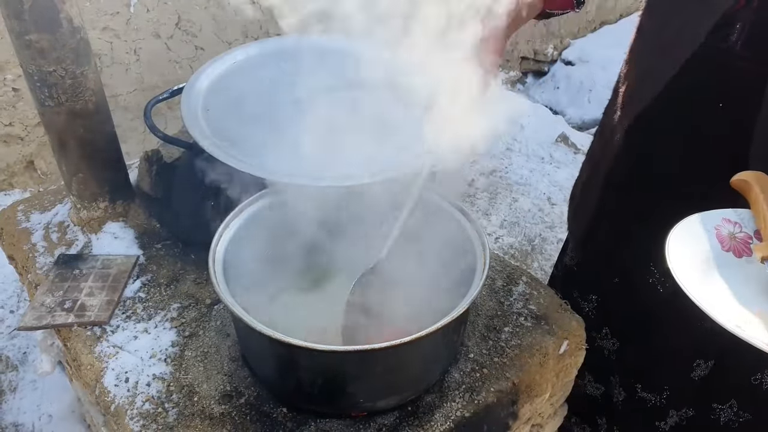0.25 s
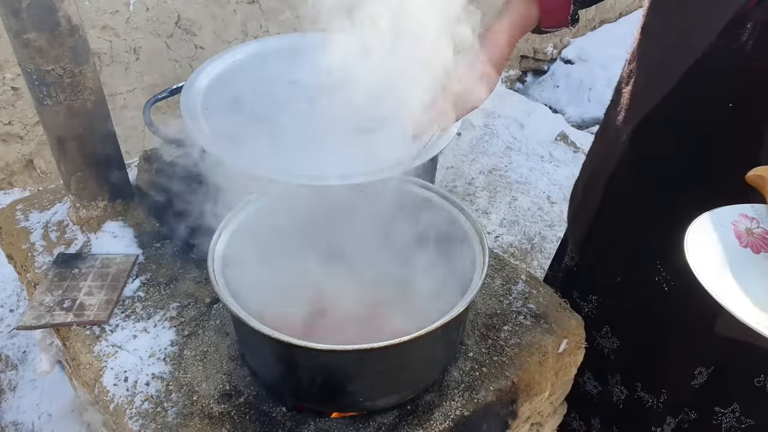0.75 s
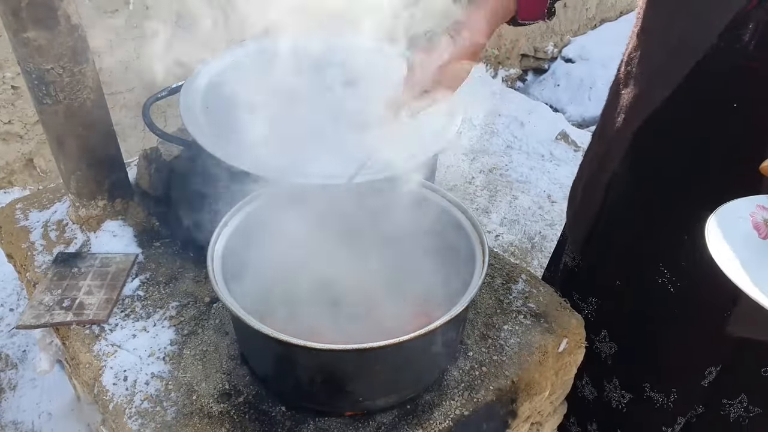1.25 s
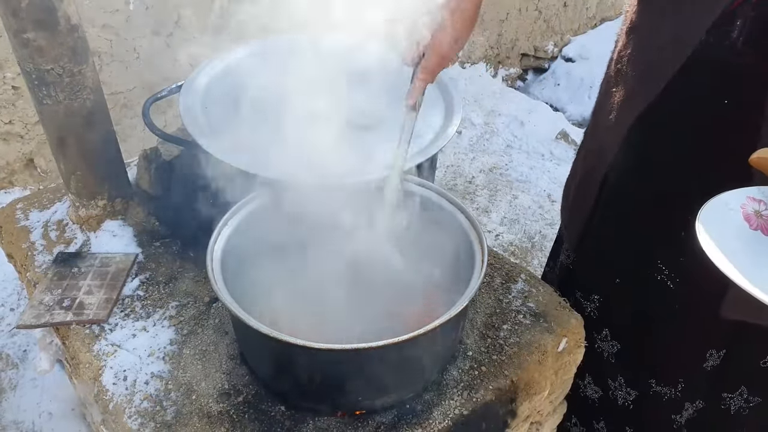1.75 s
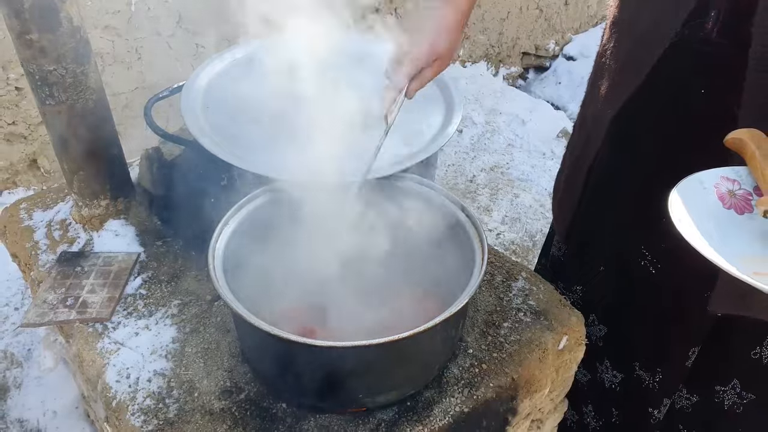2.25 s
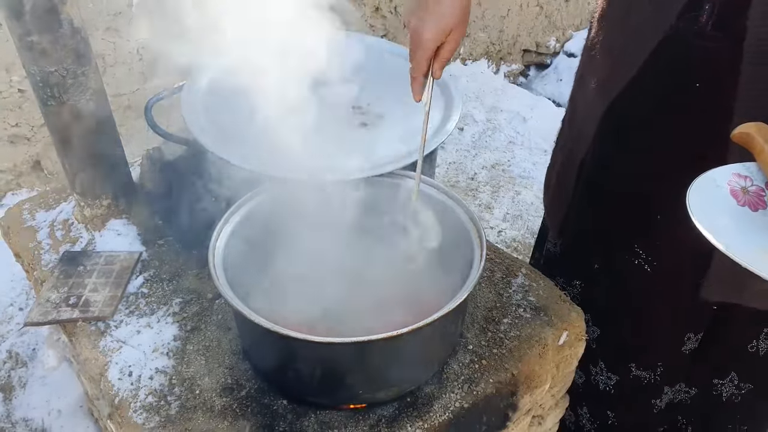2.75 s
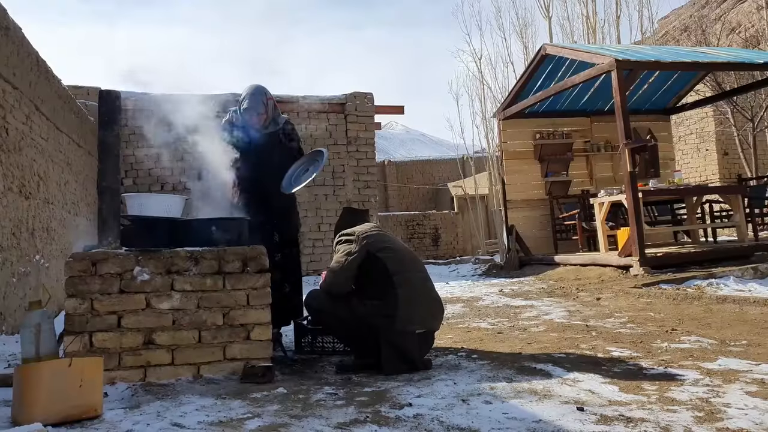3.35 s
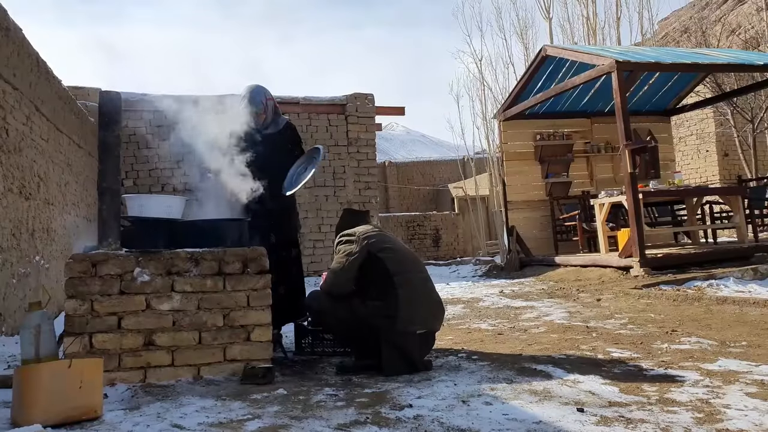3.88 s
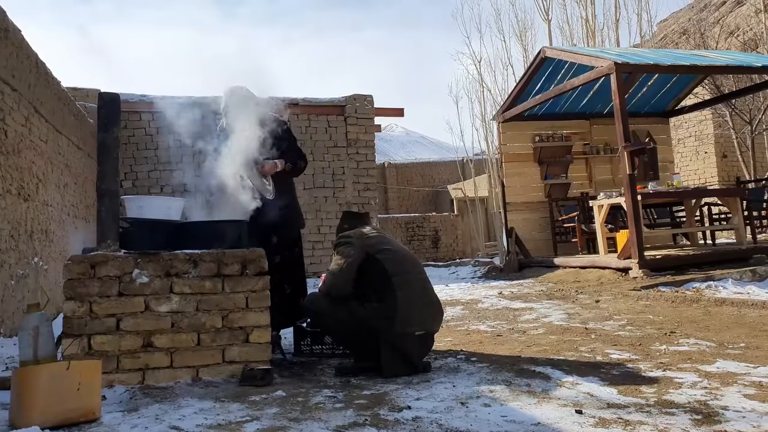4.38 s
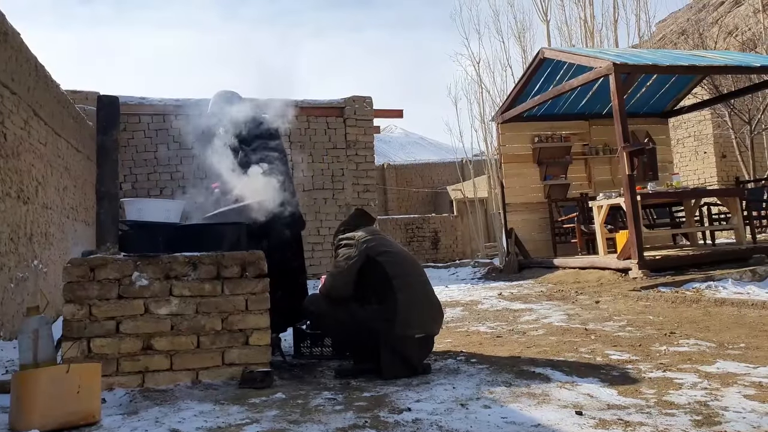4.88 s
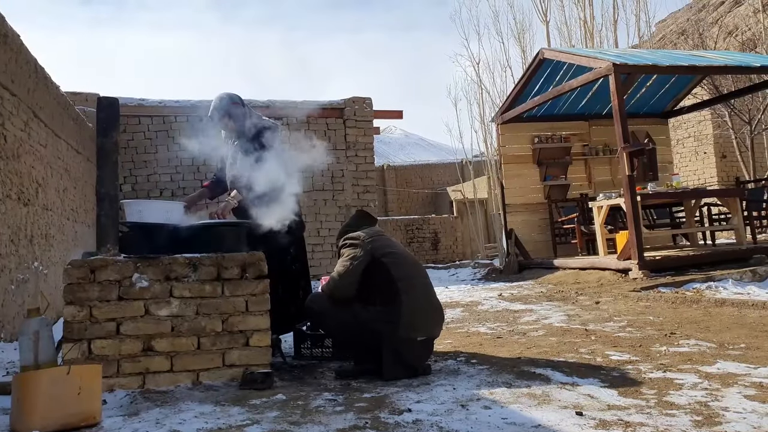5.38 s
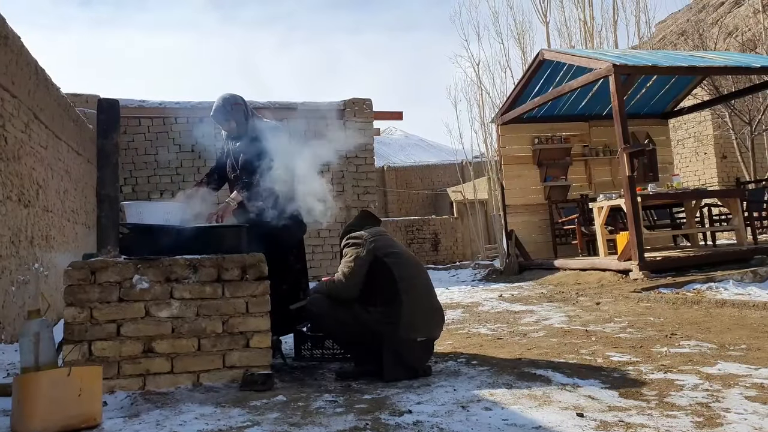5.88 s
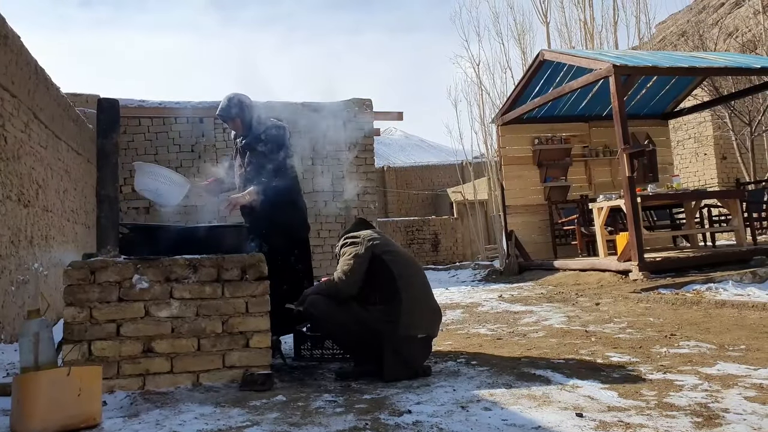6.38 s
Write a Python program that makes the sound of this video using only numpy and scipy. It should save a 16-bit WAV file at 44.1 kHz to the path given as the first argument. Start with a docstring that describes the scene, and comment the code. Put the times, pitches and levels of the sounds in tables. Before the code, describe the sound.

A big pot boils hard up close with gurgle and hiss, a ladle clanks its rim, then firewood knocks and scrapes across a yard.

```python
"""Close up, a big pot boils hard on an outdoor stove: bubbles gurgle and fizz and steam hisses (shaped noise
and short sines) while a ladle clinks the rim, thumps the wall and splashes (damped modes, noise bursts).
Then from across the yard: faint hiss in puffs, while firewood is knocked, scraped and dragged at the stove
mouth between mud walls (damped modes, noise swells, a wavering hum, a noise tail)."""
import sys
import numpy as np
from scipy import signal
from scipy.fft import rfft, irfft, next_fast_len
from scipy.io import wavfile
from scipy.ndimage import uniform_filter1d, map_coordinates

SR = 44100
rng = np.random.default_rng(int(sys.argv[2]) if len(sys.argv) > 2 else 0)


def bounce(signal):
    """Save signal as a 16-bit WAV file at the path given by the first command-line argument."""
    frames = np.transpose(np.atleast_2d(signal))
    limited = np.clip(frames, -1, 1)
    pcm = np.round(limited * 32767).astype(np.int16)
    wavfile.write(sys.argv[1], SR, pcm)


N = 291942
CONTACT_S = np.arange(SR // 4) / SR  # time after a contact

# grit of scraped or struck wood: freq_hz, density_db
GRIT_SPECTRUM = [(260, -57), (450, 0), (517, -3), (878, -12), (1080, -6), (1320, -11), (1660, -6),
                 (1800, -12), (2180, -13.5), (2600, -20.5), (3380, -23.5), (5720, -120)]
# crack of a hard contact, also the thin far fizz: freq_hz, density_db
CRACK_SPECTRUM = [(1500, -33), (2500, 2.5), (4500, 7.5), (7000, -6), (12000, -5.5), (16000, -20)]
# sharp bright tick of a hard contact: freq_hz, density_db
TICK_SPECTRUM = [(2000, -44), (4000, -2), (8000, -4), (16000, -11)]


def amp(db):
    """Gain of a level in dB."""
    return 10 ** (np.asarray(db) / 20)


def unit(x):
    """Scaled to rms 1."""
    return x / np.sqrt(np.mean(x ** 2) + 1e-20)


def along(points, hz):
    """Interpolates (freq_hz, value) points on a log frequency axis."""
    freq_hz, value = np.transpose(points)
    return np.interp(np.log(hz + 1), np.log(freq_hz + 1), value)


def curve(rows):
    """One value per sample from (time_s, value) rows."""
    time_s, value = np.transpose(rows)
    return np.interp(np.arange(N) / SR, time_s, value)


def wobble(rate_hz):
    """Smooth random curve, rate_hz knots a second."""
    knots = rng.standard_normal(int(N * rate_hz / SR) + 4)
    return map_coordinates(knots, [np.arange(N) * rate_hz / SR])


def flutter(rate_hz, depth_db):
    """Uneven gain over one contact, as loose parts touch and part."""
    knots = np.arange(int(rate_hz * CONTACT_S[-1]) + 2)
    return amp(depth_db * np.interp(CONTACT_S * rate_hz, knots, rng.standard_normal(len(knots))))


def swells(rows, rise_s, t60_s):
    """Gain of events that rise, hold and die away; one curve for each dB column."""
    start_s, held_s, *levels_db = np.transpose(rows)
    grid_s = np.arange(0, N / SR, 1 / 1000)
    since_s = grid_s - start_s[:, None]
    fall_s = np.clip(since_s - rise_s - held_s[:, None], 0, 1)
    shape = np.clip(since_s / rise_s, 0, 1) * amp(-60 * fall_s / t60_s)
    # overlapping events add in power
    gains = [np.sqrt(amp(2 * level_db) @ shape ** 2) for level_db in levels_db]
    return [np.interp(np.arange(N) / SR, grid_s, gain) for gain in gains]


def filtered(x, response):
    """x times a response of frequency."""
    m = next_fast_len(x.shape[-1] + 8192)
    return irfft(rfft(x, m) * response(np.fft.rfftfreq(m, 1 / SR)), m)[..., :x.shape[-1]]


def rush(spectrum, lump_rate_hz, lump_db, patchy_db=2.5):
    """Stereo noise, mid rms 1, with random level changes over time and frequency."""
    # left-right likeness: freq_hz, correlation
    likeness = [(60, 0.97), (150, 0.96), (380, 0.84), (950, 0.8), (2380, 0.25), (5980, -0.0034),
                (15000, -0.02)]
    # left over right: freq_hz, balance_db
    balance = [(60, 0.5), (180, -1.5), (550, 0), (1650, 0.5), (4970, -1), (15000, -6)]
    lumpy = rng.standard_normal((2, N)) * amp(lump_db * wobble(lump_rate_hz))
    z = signal.stft(lumpy, nperseg=1024)[2]
    patches = uniform_filter1d(rng.standard_normal(z.shape[1:]), size=4, axis=0)
    patches = unit(uniform_filter1d(patches, size=4, axis=1))
    pair = signal.istft(z * amp(patchy_db * patches), nperseg=1024)[1][:, :N]

    def mid_side(hz):
        angle = np.arccos(np.clip(along(likeness, hz), -1, 1)) / 2
        return amp(along(spectrum, hz)) * [np.cos(angle), np.sin(angle)]

    mid, side = filtered(pair, mid_side)
    sides = np.array([mid + side, mid - side])
    sides = filtered(sides, lambda hz: amp(np.outer([.5, -.5], along(balance, hz))))
    return sides / np.sqrt(np.mean(sides.mean(axis=0) ** 2))


def droplets(count, mid_hz, cycles):
    """Tiny bursting bubbles: short sines, gliding up, of scattered pitch, size and side."""
    where, side = rng.random(count), rng.random(count)
    size = rng.exponential(size=count)
    hz = np.clip(mid_hz * np.exp(.4 * rng.standard_normal(count)), 400, 14000)[:, None]
    n = np.arange(600)
    turns = hz * n / SR
    tone = np.sin(2 * np.pi * turns * (1 + 0.0025 * turns))
    fade = np.exp(-turns / cycles) * np.hanning(len(n)) ** 0.22
    drops = amp(2.0 * np.minimum(size, 3.5))[:, None] * tone * fade
    at = ((where * N).astype(int)[:, None] + n).ravel()
    panned = [(drops * np.sqrt(share)[:, None]).ravel() for share in (side, 1 - side)]
    return unit(np.array([np.bincount(at, x, N + len(n))[:N] for x in panned]))


def ring(modes, spread_db, attack_s, rough_db=0):
    """Damped modes (hz, db, t60_s), struck at new strengths, each wavering on its own."""
    tones = 0
    for hz, db, t60_s in modes:
        decay = amp(db + spread_db * rng.standard_normal() - 60 * CONTACT_S / t60_s)
        tones = tones + decay * flutter(51, rough_db) * np.sin(2 * np.pi * hz * CONTACT_S)
    return tones * (1 - np.exp(-CONTACT_S / attack_s))


def burst(spectrum, t60_s, attack_s):
    """A grainy puff of coloured noise that dies away."""
    grains = rng.standard_normal(len(CONTACT_S)) * flutter(200, depth_db=2.0)
    coloured = unit(filtered(grains, lambda hz: amp(along(spectrum, hz))))
    to_zero = 1 - (CONTACT_S / CONTACT_S[-1]) ** 2
    return coloured * amp(-60 * CONTACT_S / t60_s) * to_zero * (1 - np.exp(-CONTACT_S / attack_s))


def add(track, start_s, sound):
    """Mixes a sound in at a time."""
    track[round(start_s * SR):][:len(sound)] += sound


def walls(x):
    """Yard's answer: noise tail dying at its own speed per frequency, bass more alike at both sides."""
    # mud walls: freq_hz, t60_s
    wall_decay = [(150, 0.28), (1000, 0.28), (4000, 0.22), (12000, 0.13)]
    hz, t, z = signal.stft(rng.standard_normal((2, SR // 2)), SR, nperseg=256)
    apart = np.clip(hz / 900, .1, 1)[:, None]
    z = np.array([z[0] + apart * z[1], z[0] - apart * z[1]]) / np.sqrt(1 + apart ** 2)
    tail = signal.istft(z * amp(-60 * t / along(wall_decay, hz)[:, None]), SR, nperseg=256)[1]
    delayed = np.pad(x, (500, 0))  # samples
    return signal.fftconvolve(delayed[None], tail / np.linalg.norm(tail[0]), axes=1)[:, :N]


def placed(x, left_db, ports):
    """A small source, weak in the deep bass, reaching the two microphone ports at different phase."""
    half = np.array([[.5], [-.5]])

    def response(hz):
        bass_cut = (1j * hz / (85 + 1j * hz)) ** 2
        return amp(half * left_db) * np.exp(1j * half * along(ports, hz)) * bass_cut

    return filtered(x, response)


def ported(pair, ports):
    """Spread sound, too, reaches the two microphone ports at different phase."""
    return filtered(pair, lambda hz: np.exp(1j * np.outer([.5, -.5], along(ports, hz))))


def yard():
    """The pot from afar, hissing in puffs, and wood scraping and settling in uneven slips, as shaped noise."""
    # far hiss: time_s, level_db
    far_level = [(3.22, -67.5), (3.4, -68), (4.2, -68), (4.45, -68.5), (5.1, -66.5), (5.4, -71.5),
                 (6.15, -75.5), (6.25, -74.5), (6.62, -74)]
    # steam drifting by: start_s, held_s, level_db
    puff_rows = [(4.52, .15, -62.5), (4.68, .1, -63.5), (6.17, .36, -64)]
    # thin fizz just after the move: start_s, held_s, level_db
    linger_rows = [(3.22, .075, -60.5)]
    # wood scrapes and settles: start_s, held_s, rumble_db, grit_db, dust_db
    scrape_rows = [(3.31, 0.14, -70, -73, -76), (3.46, 0.044, -43.5, -63, -55.5),
                   (3.77, 0.04, -60, -63, -80), (3.9, .19, -71, -72, -81), (4.13, .16, -48.5, -56, -71),
                   (4.62, 0.31, -58.5, -72, -74.5), (5.42, 0.18, -46, -65, -64),
                   (5.8, 0.13, -43.5, -62, -65), (5.89, 0.063, -39.5, -51, -60.5),
                   (6.47, 0.1, -70, -71, -87.5)]
    # far fizz: freq_hz, density_db
    far_fizz = [(470, -6), (800, -3), (866, -3), (897, -12), (1220, 6), (1330, -5), (1660, 2), (1810, -2.5),
                (2570, -1), (3030, -4.5), (3520, -3.5), (3810, -5), (4870, -2.5), (6500, -5.5), (8450, -11),
                (14300, -120)]
    # far steam: freq_hz, density_db
    far_steam = [(2650, -49), (4500, -8), (5640, -2.5), (6270, -13), (7490, -8.5), (8500, -2), (12000, -3),
                 (14000, -5.5), (15100, -4.5), (15800, -9)]
    # scrape rumble: freq_hz, density_db
    rumble_spectrum = [(15, -59), (25, -33), (59, -14), (81, -13), (118, -7), (181, -9.5), (227, -0.5),
                       (270, -10), (305, -6.5), (425, -12), (518, -41.5), (600, -22), (780, -27),
                       (1320, -120)]
    still_rumble_db, still_grit_db = -64, -72  # floor, also between scrapes

    hiss = amp(curve(far_level))
    puff, = swells(puff_rows, rise_s=0.083, t60_s=0.19)
    linger, = swells(linger_rows, rise_s=.005, t60_s=.05)
    rumble, grit, dust = swells(scrape_rows, rise_s=0.0067, t60_s=0.36)
    fizz = amp(-0.5) * hiss + amp(-7) * puff + dust

    out = linger * rush(CRACK_SPECTRUM, 90, lump_db=-0.5)
    out += (hiss + puff) * rush(far_steam, 130, lump_db=0.6)
    out += fizz * rush(far_fizz, 60, lump_db=0.5)
    out += (amp(still_rumble_db) + rumble) * rush(rumble_spectrum, 30, lump_db=3)
    out += (amp(still_grit_db) + grit) * rush(GRIT_SPECTRUM, 65, lump_db=2.0)
    return out


def pot():
    """Big bubbles gurgle at the pot's air resonance, small ones fizz and ping, steam hisses on top."""
    # strength of the boil: time_s, strength_db
    boil = [(0, 0.5), (.45, 2), (.65, -.5), (.9, 1.5), (1.3, 0.5), (2.0, -1.5), (2.25, 1), (2.7, -0.5),
            (3.15, 2)]
    # gurgle: freq_hz, density_db
    gurgle_spectrum = [(15, -56), (25, -24), (70, -14.5), (102, -9), (161, -8), (205, -1.5), (249, 2),
                       (284, 1.5), (333, -15.5), (450, -14), (580, -46), (990, -120)]
    # bubbles: freq_hz, density_db
    bubble_spectrum = [(210, -40), (350, -8.5), (376, -2.5), (426, -12), (520, -2), (662, -10), (726, -2.5),
                       (802, 1), (983, -7), (1300, -10.5), (1690, -28), (2860, -120)]
    # fizz: freq_hz, density_db
    fizz_spectrum = [(590, -40), (1000, -8), (1530, -4.5), (1700, -4), (1970, -0.5), (2150, -8.5),
                     (2390, 0), (2700, -3), (2940, -3), (3960, 0), (5500, -8), (7150, -35), (12100, -120)]
    # steam: freq_hz, density_db
    steam_spectrum = [(2820, -28), (4800, -1.5), (6070, -2), (6840, 0.5), (8730, -2), (9500, 0),
                      (10900, -3), (11900, -0.5), (15000, -6), (15800, -4.5)]

    boil_db = curve(boil)
    # each layer: level at strength 0, plus its swing in dB per dB of strength
    gurgle = amp(-53 + 0.81 * boil_db) * rush(gurgle_spectrum, 25, lump_db=-1.5)
    bubbles = amp(-55.5 + 0.82 * boil_db) * rush(bubble_spectrum, 39.63, lump_db=0.5)
    pings = amp(-9) * droplets(count=5000, mid_hz=3354, cycles=13)
    fizz = amp(-49.5 + boil_db) * (rush(fizz_spectrum, 90, lump_db=1.5) + pings)
    steam_db = -49.5 + 0.63 * boil_db + 0.99 * wobble(17)
    steam = amp(steam_db) * rush(steam_spectrum, 150, lump_db=1.1)
    return gurgle + bubbles + fizz + steam


def clinks(track):
    """Ladle on the rim: damped rim modes, a crack and a higher tick."""
    # ladle on the rim: start_s, level_db, ring_db (relative)
    clink_rows = [(1.373, -23, 2.5), (1.453, -30, -27), (1.47, -26, -16), (1.524, -27.5, -22),
                  (1.544, -36.5, -19)]
    # rim modes: freq_hz, level_db, t60_s
    rim_modes = [(877, -12, .06), (1276, -3.5, 0.11), (3046, -3, 0.16), (3330, -14, 0.08), (3984, -6, 0.08),
                 (4220, -14, 0.09), (4390, -12, .1), (5900, -15, .04), (6780, -12, 0.053)]
    for start_s, db, ring_db in clink_rows:
        rim = amp(ring_db) * ring(rim_modes, spread_db=-1.5, attack_s=.002, rough_db=2.0)
        crack = 0.63 * burst(CRACK_SPECTRUM, t60_s=0.14, attack_s=0.00077)
        tick = amp(-5.5) * burst(TICK_SPECTRUM, t60_s=0.072, attack_s=.0008)
        add(track, start_s, amp(db) * (rim + crack + tick))


def thumps(track):
    """Ladle on the water-damped wall: modes at multiples of one base pitch."""
    # ladle on the wall: start_s, level_db, base_hz, t60_s, overtones_db (relative)
    thump_rows = [(0.15, -38.5, 262, 0.13, -13), (0.382, -37.5, 262.3, 0.37, -27),
                  (0.418, -36.5, 247.4, 0.31, -14), (1.373, -30, 252, 0.14, 1.5),
                  (1.454, -22, 263, 0.09, 0), (1.471, -7, 302.2, 0.096, 0.5),
                  (1.524, -11.5, 262, 0.063, -1.5), (1.55, -31.5, 257, 0.047, -9),
                  (2.252, -33.5, 240, 0.17, -22)]
    # wall modes: multiple of base_hz, level_db, share of t60_s
    wall_modes = [(1, 1.5, 0.72), (2, 2, 0.36), (3.7, -9.5, 0.47), (.8, -9, 1.4), (.55, -18.5, 1.4)]
    for start_s, db, hz, t60_s, over_db in thump_rows:
        modes = [(hz * k, level_db + over_db * (k > 1), t60_s * share) for k, level_db, share in wall_modes]
        add(track, start_s, amp(db) * ring(modes, spread_db=1.6, attack_s=0.0021))


def splashes(track):
    """Splashes as noise bursts, and a single drop falling back as two damped sines."""
    # falling drop: start_s, pitch_hz, level_db, t60_s
    plop_rows = [(.846, 2100, -37, .035)]
    # splashes: start_s, level_db, t60_s
    splash_rows = [(1.449, -28.5, 0.16), (1.545, -38.5, 0.18), (1.818, -31.5, 0.23), (1.83, -32, 0.57),
                   (1.885, -39, 0.45)]
    # spray: freq_hz, density_db
    spray_spectrum = [(76, -39), (130, -6), (202, -1.5), (425, -15), (689, -3.5), (859, -18.5), (1310, -7),
                      (1420, -7.5), (2120, -7.5), (2700, -9.5), (2870, -22.5), (3870, -13.5), (7080, -26.5),
                      (11700, -22.5), (15800, -26.5)]
    for start_s, hz, db, t60_s in plop_rows:
        modes = [(hz, db, t60_s), (hz * 1.12, db - 3, t60_s)]
        add(track, start_s, ring(modes, spread_db=.5, attack_s=.0015))
    for start_s, db, t60_s in splash_rows:
        add(track, start_s, amp(db) * burst(spray_spectrum, t60_s, attack_s=0.0039))


def ladle():
    """All contacts of the ladle with rim, wall and water, mono."""
    track = np.zeros(N + SR)
    clinks(track)
    thumps(track)
    splashes(track)
    return track[:N]


def ticks(track):
    """Sharp bright ticks of hard contacts, mostly on top of a knock: short noise bursts."""
    # ticks: start_s, level_db
    tick_rows = [(3.434, -41), (3.4995, -35.5), (3.8985, -68), (4.1626, -50), (4.213, -51), (4.3037, -53),
                 (4.598, -52), (5.4196, -47.5), (5.431, -53), (5.49, -50), (5.864, -50), (5.887, -58),
                 (5.912, -52), (5.93, -58)]
    for start_s, db in tick_rows:
        add(track, start_s, amp(db) * burst(TICK_SPECTRUM, t60_s=0.047, attack_s=0.00037))


def dragged_wood():
    """A hollow piece dragged in slips: a hum of wavering pitch and level."""
    # slips: start_s, held_s, level_db
    slip_rows = [(4.63, 0.023, -48), (4.69, 0.033, -48), (4.79, .04, -46), (4.83, 0.015, -41),
                 (4.87, 0.022, -39.5), (4.92, 0.044, -51.5), (4.99, 0.018, -45.5)]
    slips, = swells(slip_rows, rise_s=0.0063, t60_s=0.046)
    hum_hz = 313 * (1 + 0.043 * wobble(40))
    return slips * amp(2.5 * wobble(41)) * np.sin(2 * np.pi * np.cumsum(hum_hz) / SR)


def knocks(track):
    """Each knock: a hollow low mode set by the piece, upper modes near where it was struck, and a crack."""
    # firewood: start_s, level_db, low_mode_hz, upper_db (relative), upper_centre_hz
    knock_rows = [(3.304, -51, 155, 0.5, 746), (3.388, -51, 252, 10.5, 2050), (3.436, -17, 321, -28, 638),
                  (3.463, -48, 334, -25, 616), (3.5, -33.5, 240, -2, 1030), (3.524, -33.5, 197, -14, 1020),
                  (3.588, -45, 275, -5, 619), (3.76, -57, 248, 6, 1970), (3.8, -46, 410, -12, 2000),
                  (3.817, -42, 270, -6, 743), (4.024, -46.5, 380, -17, 1910), (4.115, -39, 308, 4.5, 1110),
                  (4.144, -33.5, 338, -13, 710), (4.164, -38, 273, 1, 1060), (4.211, -33.5, 270, -12, 1000),
                  (4.26, -34, 350, -9, 1030), (4.304, -33.5, 323, -21, 1210),
                  (4.359, -39.5, 272, -16, 1070), (4.501, -45, 262, -14, 1200),
                  (4.597, -45, 344, -1.5, 1250), (4.614, -35, 310, -22, 633), (4.979, -36.5, 308, -15, 684),
                  (5.046, -35, 320, -24, 640), (5.34, -51.5, 266, -4.5, 1210),
                  (5.412, -26.5, 355, -10, 1240), (5.488, -23.5, 264, -9, 860), (5.518, -34, 240, -10, 600),
                  (5.568, -33.5, 232, -35, 616), (5.673, -40.5, 187, -10, 716), (5.781, -30, 305, -19, 719),
                  (5.822, -28.5, 190, -11.5, 680), (5.853, -31.5, 188, -6, 622),
                  (5.883, -16, 338, -9.5, 760), (5.908, -17.5, 179.6, -12, 617),
                  (5.939, -17.5, 167.3, -29, 662), (5.973, -24.5, 187.6, -23, 896),
                  (6.001, -26, 183, -23.5, 616), (6.075, -38.5, 190, -29, 649),
                  (6.479, -50, 228, -14, 2140), (6.52, -50, 220, -16, 700), (6.56, -45, 226, -8, 716)]
    # upper modes of the wood: freq_hz, level_db, t60_s
    log_modes = [(520, 12, 0.016), (707, -3.5, 0.059), (864, -3.5, 0.049), (1064, 0, 0.03),
                 (1220, -5.5, 0.09), (1430, -6.5, 0.0089), (1610, -5.5, 0.034), (1926, -9, 0.05),
                 (2365, -2, 0.028)]
    for start_s, db, hz, upper_db, upper_hz in knock_rows:
        t60_s = 22.3 / hz  # low mode falls 60 dB in 22.3 cycles
        low_modes = [(hz, 0, t60_s), (hz * 1.14, -6, t60_s * .6), (hz * .42, -22, t60_s)]
        hollow = ring(low_modes, spread_db=.5, attack_s=.002)
        # 14 dB per octave away from upper_hz
        struck = [(mode_hz, level_db - 14 * abs(np.log2(mode_hz / upper_hz)), mode_t60_s)
                  for mode_hz, level_db, mode_t60_s in log_modes]
        upper = ring(struck, spread_db=5.0, attack_s=0.0018, rough_db=6.0)
        upper = upper + 0.65 * burst(GRIT_SPECTRUM, t60_s=0.13, attack_s=0.005)
        # stronger upper modes come with more crack
        crack = amp(-9.5 + 0.64 * upper_db) * burst(CRACK_SPECTRUM, t60_s=0.083, attack_s=0.011)
        add(track, start_s, amp(db) * (hollow + amp(upper_db) * upper + crack))


def firewood():
    """Knocked, ticking and dragged wood, mono."""
    track = np.zeros(N + SR)
    knocks(track)
    ticks(track)
    return track[:N] + dragged_wood()


def scene():
    """Close to the pot, then across the yard, by a short crossfade."""
    # near phase: freq_hz, left_lead_rad
    ports_near = [(100, .03), (300, .12), (600, .6), (1200, 1.7), (2500, 1.2), (5000, 1.6), (16000, 1.6)]
    # far phase: freq_hz, left_lead_rad
    ports_far = [(100, .08), (300, .26), (600, .6), (1200, 1.3), (2500, 1.3), (5000, 1.6), (16000, 1.6)]
    move_s, fade_s = 3.213, 0.017
    far = np.clip((np.arange(N) / SR - move_s) / fade_s + .5, 0, 1)
    near_hits, far_hits = ladle(), firewood()
    near = pot() + placed(near_hits, left_db=-1.7, ports=ports_near) + amp(-13.5) * walls(near_hits)
    distant = ported(yard(), ports_far) + placed(far_hits, left_db=-0.2, ports=ports_far)
    distant = distant + amp(-7.5) * walls(far_hits)
    return (1 - far) * near + far * distant


def record(dry):
    """The microphone has a few dips and keeps nothing above its band limit."""
    # response dips: centre_hz, half_width_hz, depth_db
    mic_dips = [(2690, 190, -5), (5190, 700, -4), (7140, 570, -3.5)]
    top_hz = 15780

    def response(hz):
        dips_db = sum(db / (1 + ((hz - at_hz) / width_hz) ** 2) for at_hz, width_hz, db in mic_dips)
        return amp(dips_db) * (hz < top_hz)

    return filtered(dry, response)


dry = scene()
out = record(dry)
bounce(out)
```